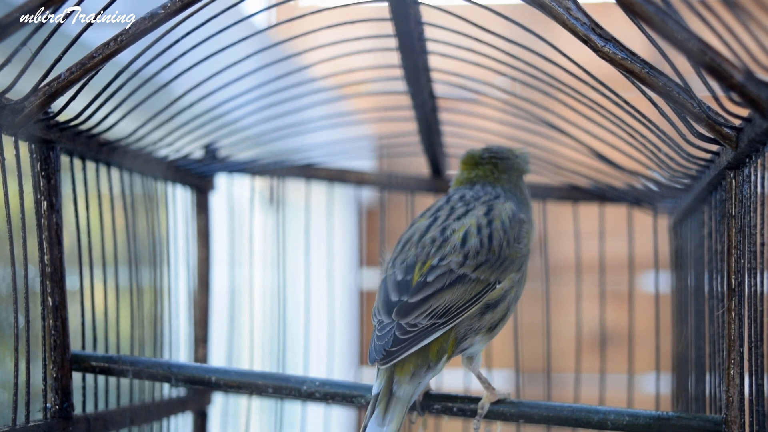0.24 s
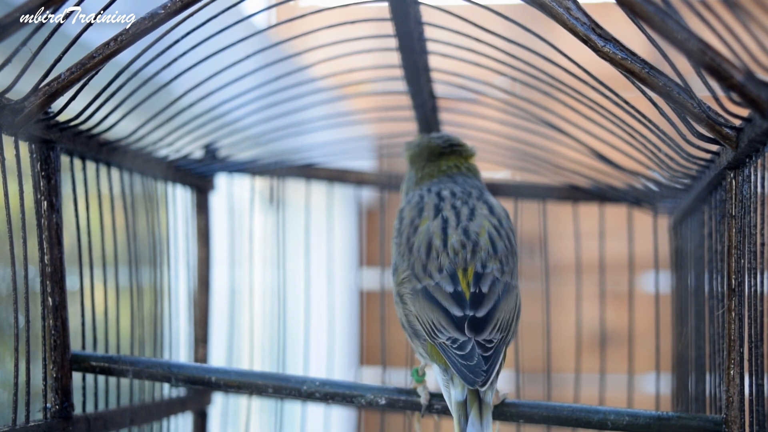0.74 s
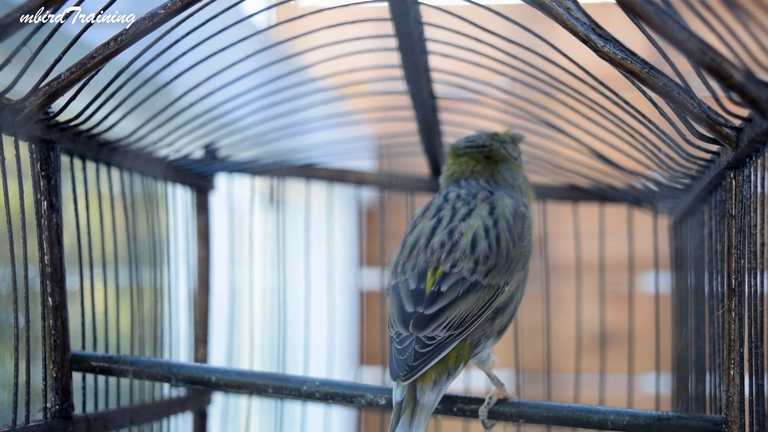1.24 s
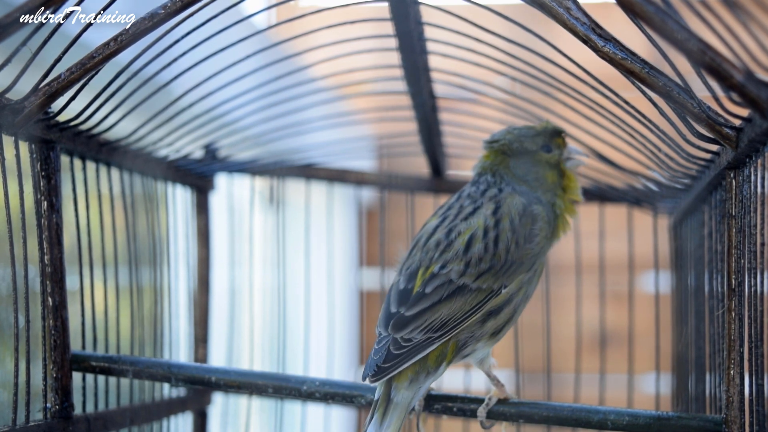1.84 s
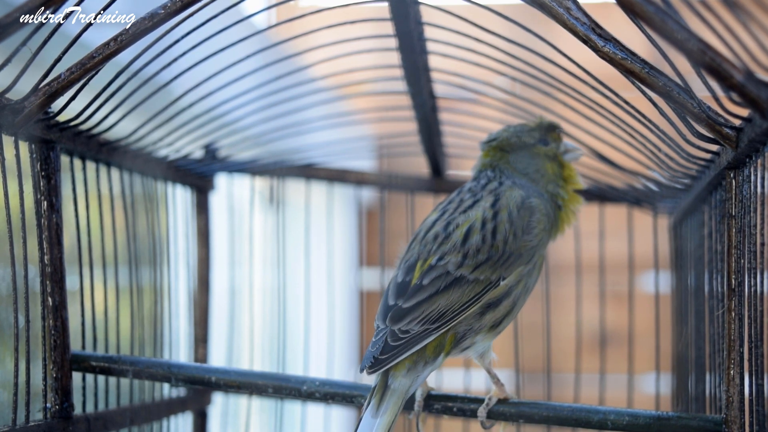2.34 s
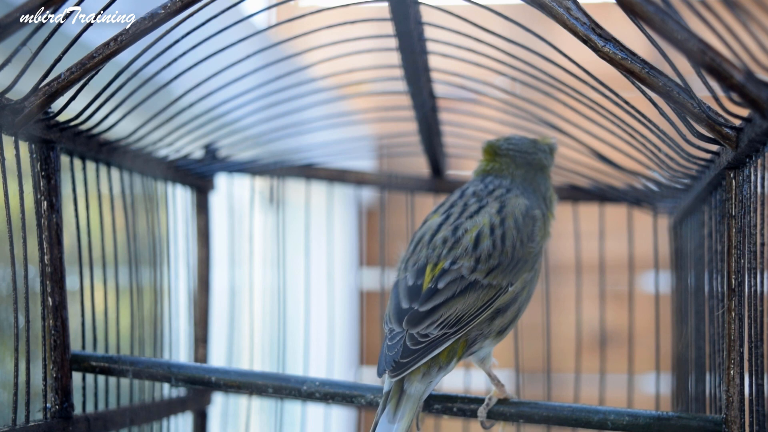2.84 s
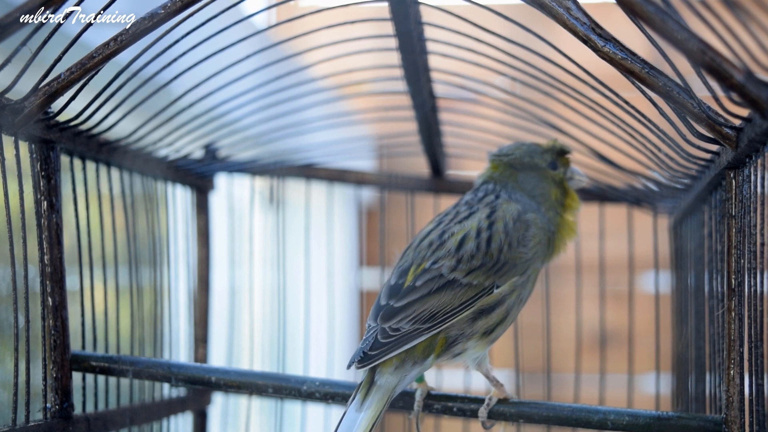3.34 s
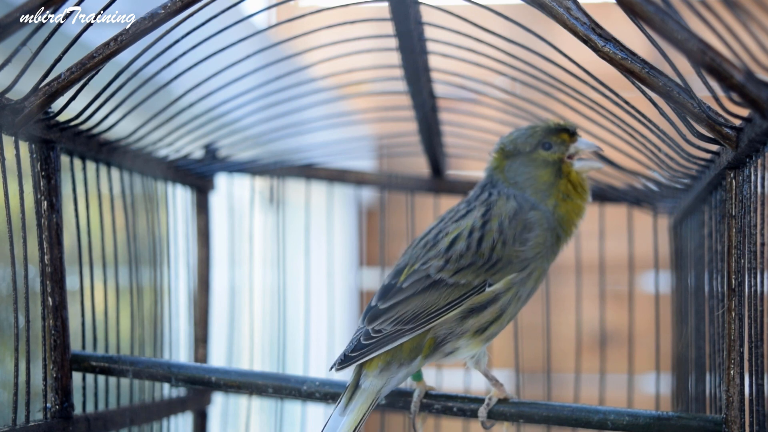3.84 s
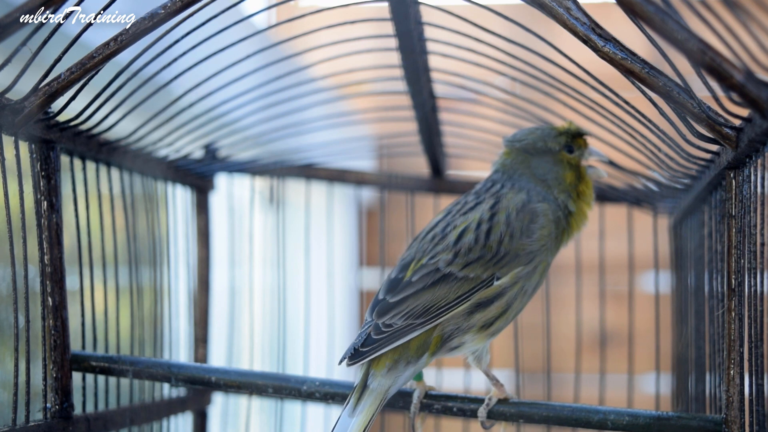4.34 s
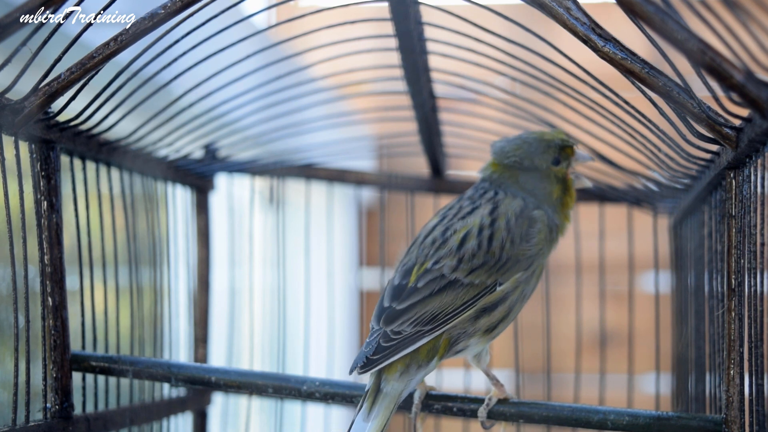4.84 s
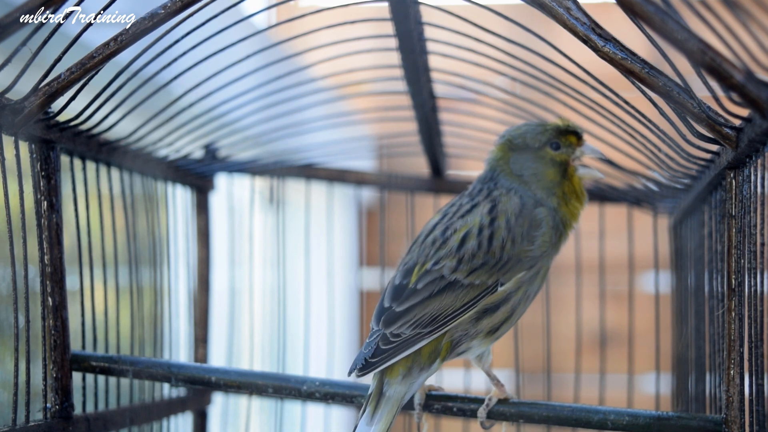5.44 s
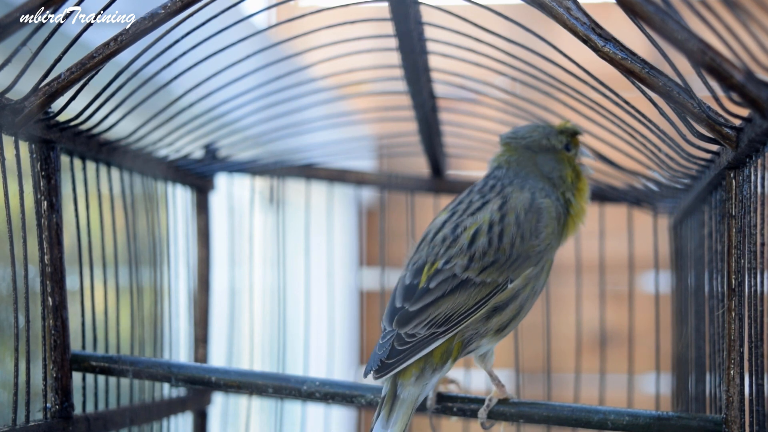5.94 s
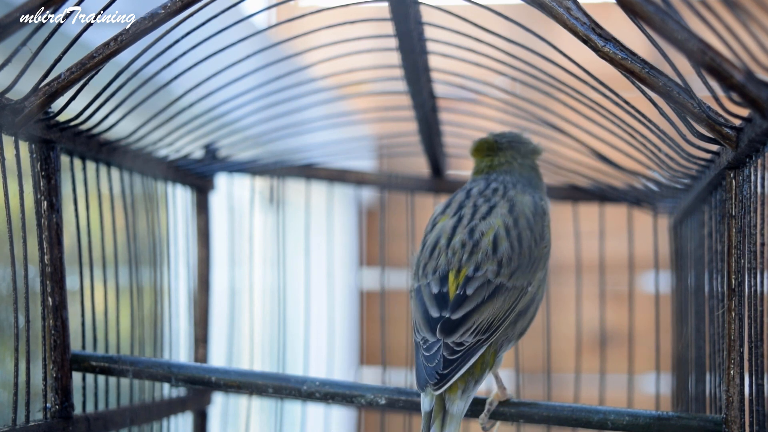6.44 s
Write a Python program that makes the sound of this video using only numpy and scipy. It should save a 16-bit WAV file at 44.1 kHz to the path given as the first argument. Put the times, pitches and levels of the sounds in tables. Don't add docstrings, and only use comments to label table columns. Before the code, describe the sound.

Bright, loud canary song, close and slightly flattened at the peaks by a limiter. It changes phrase about every second: ticking arches, steep downward chirps, a fast string of upward chirps, a low rattling roll, paired chip-and-sweep notes, then sliding whistles to the end. The small room adds a brief splashy tail; soft street noise, a far dove and distant bird calls lie beneath.

```python
import sys
import numpy as np
from scipy import signal
from scipy.fft import rfft, irfft, next_fast_len
from scipy.io import wavfile
from scipy.ndimage import uniform_filter1d

SR = 44100
rng = np.random.default_rng(int(sys.argv[2]) if len(sys.argv) > 2 else 0)


def file_out(sig):
    cols = np.atleast_2d(sig).T
    lim = np.clip(cols, -1, 1)
    pcm = np.round(lim * 32767).astype(np.int16)
    wavfile.write(sys.argv[1], SR, pcm)


def attenuation_scalar(level_db):
    decades = np.asarray(level_db, float) / 20
    return 10 ** decades


N = 295029


def along(points, hz):
    f, v = np.transpose(points)
    return np.interp(np.log(hz + 1), np.log(f + 1), v)


def shiver(count, size):
    noise = rng.standard_normal(count + 2 * size)
    return signal.fftconvolve(noise, np.hanning(2 * size), "valid")[:count] / np.sqrt(3 * size / 4)


def add_note(track, start, shape, overtones, level_db=0, pitch=1, unsteady=0.0031, flutter_db=2.5,
             fade_s=0.00096, wander=0, notch_hz=3500, notch_db=0, shimmer_db=5):
    # frequency in Hz, level in dB.
    beak_colour = [(2000, 60), (5000, -2), (6800, -9.5), (8000, -6.5), (9300, -8.5), (10700, -9.5),
                   (11800, -4.5), (13000, -9), (16000, -15.5)]
    s, hz, db = np.transpose(shape)
    t = np.arange(s[0], s[-1], 1 / SR)
    count = len(t)
    smooth = min(max(count // 16, 1), 220)
    glide = uniform_filter1d(np.interp(t, s, hz), smooth, mode="nearest")
    waver = unsteady * shiver(count, size=64) + wander * shiver(count, size=500)
    f = pitch * glide * (1 + waver)
    phase = 2 * np.pi * (np.cumsum(f) / SR + rng.random())

    tone = np.sin(phase) * attenuation_scalar(-notch_db * np.exp(-((f - notch_hz) / 240) ** 2))
    for multiple, overtone_db in overtones:
        colour_db = overtone_db + along(beak_colour, multiple * f) + shimmer_db * shiver(count, size=200)
        tone = tone + attenuation_scalar(colour_db) * np.sin(multiple * phase) * (multiple * f < SR / 2)

    to_edge_s = np.minimum(t - s[0], s[-1] - t)
    fade = np.sin(np.pi / 2 * np.clip(to_edge_s / fade_s, 0, 1)) ** 2
    loudness = attenuation_scalar(level_db + np.interp(t, s, db) + flutter_db * shiver(count, size=130))
    i = max(round((start + s[0]) * SR), 0)
    track[i:i + count] += tone * fade * loudness


def phrase(track, shape, times, overtones, spread=0.0054, **voice):
    for s, db in times:
        add_note(track, s, shape, overtones, db, 1 + spread * rng.standard_normal(), **voice)


def breath(track, events, length_s, level_db):
    gate = np.zeros(N + SR)
    puff = np.hanning(round(length_s * SR) + 2)
    for s, db, *_ in events:
        gate[round((s - length_s / 2) * SR):][:len(puff)] += attenuation_scalar(db + level_db) * puff
    steep = signal.butter(6, 5800, "high", fs=SR, output="sos")
    track += signal.sosfilt(steep, gate * rng.standard_normal(N + SR))


def hum(song):
    # frequency in Hz, level in dB per Hz.
    hum_colour = [(15, -44), (25, -13), (165, -6.5), (316, -9.5), (449, -11.5), (605, -13), (674, -9.5),
                  (1880, -15), (3060, -25), (3500, -14), (6510, -26.5), (14600, -36), (15900, -53)]
    # time in seconds, share of the squeeze.
    effort = [(0, 1.46), (.25, 0.46), (.32, 0.7786), (.95, 0.39), (1.02, 0.92), (1.7, 0.88), (2.45, 0.55),
              (2.7, 0.22), (3.55, 0.57), (4.3, 1.04), (6.69, 1.11)]
    open_db, knee_db, recover_db_per_s = -45.5, -27.5, 30.5
    squeeze = 0.74
    m = next_fast_len(N)
    colour = attenuation_scalar(along(hum_colour, np.fft.rfftfreq(m, 1 / SR)))
    noise = irfft(rfft(rng.standard_normal(m)) * colour, m)[:N]

    t = np.arange(N) / SR
    loud_db = 10 * np.log10(np.abs(uniform_filter1d(song ** 2, size=441)) + 1e-12)
    need_db = squeeze * np.interp(t, *np.transpose(effort)) * (loud_db - knee_db)
    need_db = np.maximum(need_db + recover_db_per_s * t, 9.5)
    duck_db = np.maximum.accumulate(need_db) - recover_db_per_s * t
    return noise / noise.std() * attenuation_scalar(open_db - np.clip(duck_db, 0, None))


def faint_tones():
    # time in seconds, pitch in Hz, level in dB.
    faint_calls = [
        [(0, 4780, -30.5), (.03, 4730, -29), (.05, 4738, -46), (.08, 4770, -46)],
        [(1.74, 745.1, -45), (1.77, 768, -47), (1.84, 743, -42), (1.9, 740, -54), (2.0, 710, -50),
         (2.1, 747, -57)],
        [(4.63, 2640, -77), (4.68, 2580, -60), (4.8, 2698, -63), (4.95, 2710, -76), (5.05, 2780, -67),
         (5.12, 2800, -64), (5.25, 2820, -88), (5.5, 2790, -66.5), (5.64, 2780, -66)],
        [(5.62, 2140, -65), (5.645, 2020, -49)],
    ]
    calls = np.zeros(N + SR)
    for call, blur in zip(faint_calls, [0.006, 0.0375, 0.032, 0.02]):
        add_note(calls, 0, call, [], unsteady=blur)
    return calls[:N]


def glide_whistles(track, shape, rows, foot_hz, bright_db):
    # multiple of the pitch, level in dB.
    overtones = [(2, -23.5), (3, -26.5), (4, -27)]
    # time in seconds, level in dB.
    push = [(.08, 0.5), (.13, 1), (.18, -18.5), (.225, 6), (.26, -19), (4.4, -0.5), (4.5, -7), (4.58, 2),
            (4.69, -7.5), (4.78, 0.5), (4.9, -6.5), (5.0, 1), (5.12, -6.5), (5.21, 2), (5.34, 0.5),
            (5.41, 3), (5.45, -0.5), (5.53, 3.5), (5.56, 1.5), (5.6, 0), (5.67, 2), (5.75, 0), (5.85, -2.5),
            (5.96, 1), (6.03, -0.5), (6.12, 0.5), (6.28, -1.5), (6.39, 2), (6.45, -0.5), (6.55, -1),
            (6.69, 2)]
    stage, pitch, db = np.transpose(shape)
    for start, first_s, second_s, shelf_hz, top_hz in rows:
        s = start + np.interp(stage, range(4), [0, 0.032, first_s, first_s + second_s])
        hz = np.interp(pitch, range(3), [foot_hz, shelf_hz, top_hz])
        glide = np.transpose([s, hz, db + np.interp(s, *np.transpose(push))])
        add_note(track, 0, glide, np.add(overtones, [0, bright_db]), unsteady=0.00055,
                 flutter_db=1.52, fade_s=0.0024, wander=0.0075)


def whistles(song):
    # stage (0 start, 1 scoop done, 2 step, 3 end),
    # pitch (0 foot, 1 shelf, 2 top), level in dB.
    slide = [(0, 0.029, -18.5), (0.201, 0.25, -12.5), (0.441, 0.3356, -12.5), (0.999, 0.57, -8.5),
             (1.349, .76, -13), (1.98, 1.0, -11.5), (2.248, 1.85, -6), (2.552, 1.99, -7.5),
             (2.998, 1.92, -18)]
    climb = [(0, 0.012, -20), (.44, 0.55, -5.5), (1, .76, -9.5), (1.75, .96, -10), (1.98, 1.0, -20.5),
             (2.15, 1.38, -9), (2.6, 1.62, -2.5), (2.848, 1.8, -5), (3, 1.99, -1)]
    terrace = [(0, 0.035, -21), (0.439, 0.79, -9.5), (1.001, .87, -9), (1.5, .94, -11), (1.979, 1.0, -17),
               (2.2, 1.3, -10.5), (2.45, 1.68, -18), (2.7, 1.93, -10), (2.999, 1.99, -8)]
    # start in seconds, first and second leg in seconds, shelf in Hz, top in Hz.
    slides = [
        (0.053, 0.083, 0.14, 4499, 4522),
        (5.654, 0.098, 0.14, 4395, 5340),
        (5.946, 0.09384, 0.13, 4440, 5344),
        (6.237, 0.1, 0.13, 4527, 5410),
        (6.534, 0.13, 0.068, 4610, 5060),
    ]
    climbs = [
        (4.363, 0.076, 0.056, 5610, 6950),
        (4.542, 0.09, 0.074, 5730, 6750),
        (4.744, 0.1, 0.072, 5666, 6810),
        (4.957, 0.093, 0.077, 5360, 6846),
    ]
    terraces = [
        (5.174, 0.091, 0.079, 4780, 5960),
        (5.399, 0.081, 0.1, 4602, 5840),
    ]
    # time in seconds, pitch in Hz, level in dB.
    dip = [(-.012, 2500, -29), (-.0105, 2000, -27), (-.008, 1850, -27), (-.005, 2080, -28),
           (-.002, 2400, -27), (.002, 2750, -21)]
    dip_db = [2, 2.6, 2.9, -2.2, -1.6]
    glide_whistles(song, slide, slides, foot_hz=2660, bright_db=-5.0)
    glide_whistles(song, climb, climbs, foot_hz=2780, bright_db=-2.0)
    glide_whistles(song, terrace, terraces, foot_hz=2550, bright_db=-1.5)
    dips = [(row[0], db) for row, db in zip(slides, dip_db)]
    phrase(song, dip, dips, [(2, -22), (3, -30)], spread=0.01, unsteady=0.005, flutter_db=1.2,
           fade_s=0.001, shimmer_db=2)


def grace_notes(song):
    # start in seconds, length in seconds, start pitch in Hz, end pitch in Hz, level in dB.
    graces = [(0.284, 0.019, 2690, 2736, -32.5), (0.287, 0.0091, 1780, 1845, -30),
              (1.675, 0.011, 2300, 2962, -35), (1.682, 0.012, 3030, 3270, -18.5),
              (2.651, 0.022, 2043, 2010, -30), (2.669, 0.024, 1934, 2580, -21),
              (2.674, 0.026, 2600, 2700, -15.5), (2.694, 0.01, 2225, 1080, -25.5),
              (3.534, 0.0044, 1940, 1467, -18.5), (3.993, 0.019, 3740, 3690, -23),
              (4.358, 0.0068, 2140, 3240, -33), (4.537, 0.0064, 3650, 2500, -20),
              (4.742, 0.0029, 2080, 3614, -22.5), (5.159, 0.0052, 3030, 2390, -27),
              (5.394, 0.0085, 3940, 2630, -21)]
    grace_bright_db = [4, -10, 4, 2.5, 9, 2, 9, -2, -1.5, -3, 5, -9, 1.5, -10, -9]
    for (s, length, start_hz, end_hz, db), bright_db in zip(graces, grace_bright_db):
        shape = [(0, start_hz, db), (length, end_hz, db)]
        overtones = np.add([(2, -27.5), (3, -25.5), (4, -33.5)], [0, bright_db])
        add_note(song, s, shape, overtones, unsteady=.006, flutter_db=4.0, fade_s=0.0016)


def arches(song):
    # time from centre in seconds, pitch in Hz, level in dB.
    arch = [(-.008, 1740, -19.5), (-.005, 2336, -15), (0, 2680, -3), (.004, 2550, -4.5), (.007, 2100, -16),
            (.01, 1527, -22), (0.014, 1020, -35)]
    arch_echo = [(.007, 2736, -26.5), (0.014, 2780, -23), (0.026, 2610, -33)]
    pip = [(-.015, 2240, -18.5), (-.012, 2480, -20.5), (-.0095, 2600, -11)]
    run_up = [(-.014, 3500, -15), (-.008, 3870, -19.5), (-.004, 4500, -45)]
    tick = [(-.0008, 5350, -5), (.0006, 5133, -2.5), (.0018, 4750, 0.5), (.0034, 4250, 13.5)]
    # time in seconds, level in dB, pitch factor, level of the echo in dB.
    arch_times = [
        (0.304, -17.5, 0.91, -3.5),
        (0.366, -4.5, 1.014, 4.5),
        (.433, -5, 0.95, 7),
        (.501, -10, 0.96, 5.5),
        (0.563, -3, 1.035, -12),
        (0.627, -2.5, 0.98, -3),
        (0.693, -3.5, 1.0, -22.5),
        (0.762, -3.5, 1.02, -17.5),
        (0.83, -4, 0.99, -13),
    ]
    pip_db = [-3, -9.5, -3, 1.5, -4.5, -1.5, -5.5, -1]
    # time in seconds, level in dB, pitch factor.
    tick_times = [
        (0.328, -10, 1.045),
        (0.3959, -10, 1.07),
        (0.4603, -6.5, 1),
        (0.526, -7.5, 1.02),
        (0.592, -6.5, 0.98),
        (0.6574, -7.5, 0.98),
        (0.724, -7, 0.98),
        (0.7916, -11, 1.02),
        (0.862, -10.5, 1.003),
    ]
    for s, db, pitch, echo_db in arch_times:
        add_note(song, s, arch, [(2, -36.5), (3, -25), (5, -38)], db, pitch, unsteady=0.0059,
                 flutter_db=-1.05, fade_s=0.001067)
        add_note(song, s, arch_echo, [], echo_db, pitch, unsteady=0.017, flutter_db=2, fade_s=0.00277)
    pips = [(row[0], db) for row, db in zip(arch_times[1:], pip_db)]
    phrase(song, pip, pips, [], spread=0.02, flutter_db=1)
    run_ups = [(s, db) for s, db, _ in tick_times]
    phrase(song, run_up, run_ups, [], spread=0.068, unsteady=0.035, flutter_db=1)
    for s, db, pitch in tick_times:
        add_note(song, s, tick, [(2, -16.5), (3, -13.5)], db, pitch, fade_s=.0013, flutter_db=1.1,
                 shimmer_db=4)
    breath(song, tick_times, 0.0031, level_db=-26)
    breath(song, arch_times, 0.016, level_db=-44)


def falls(song):
    # time in seconds, pitch in Hz, level in dB.
    fall = [(-.016, 6190, -34), (-.011, 5754, -19.5), (-.006, 5280, -4), (-.001, 5175, -14),
            (.003, 4740, -1), (.0055, 4620, -14), (.009, 4050, -8.5), (.012, 3677, -17), (.0155, 3150, -38)]
    fall_top = [(0, 7150, -31), (.008, 7020, -27), (0.016, 6700, -26), (0.024, 6250, -28.5),
                (0.031, 5900, -34.5)]
    # time in seconds, level in dB.
    fall_times = [
        (1.0004, 0.36),
        (1.0884, -0.273),
        (1.1805, -0.036),
        (1.269, 0.137),
        (1.3546, -0.32),
        (1.4405, 0.45),
        (1.532, 0.335),
        (1.621, 0.3),
    ]
    lead_db = [7, -1.5, -5.5, -1.5, -5, -1.5, -4.5, 0.5]
    fall_pace = [0.91, 1, 0.95, 1.02, 1.1, 1.4, 0.93, 2.7]
    leads = [(s - 0.0425, db) for (s, _), db in zip(fall_times, lead_db)]
    phrase(song, fall_top, leads, [(2, -17)], flutter_db=3)
    for (s, db), pace in zip(fall_times, np.clip(fall_pace, .8, 1.2)):
        stretched = np.multiply(fall, [pace, 1, 1])
        add_note(song, s, stretched, [(2, -28), (3, -25)], db, flutter_db=0.3, fade_s=0.00202)
    breath(song, fall_times, 0.016, level_db=-43.5)


def rises(song):
    # time in seconds, pitch in Hz, level in dB.
    rise = [(-0.031, 1825, -26), (-0.028, 2683, -15), (-0.023, 3032, -12), (-0.015, 3692, -15),
            (-0.008, 3835, -13.5), (0, 4840, -6), (0.004, 5340, -5.5), (0.008, 5994, -15.5),
            (0.014, 6200, -20.5)]
    top_echo = [(.012, 5950, -27.5), (0.017, 5633, -14.5), (.021, 5550, -15.5)]
    # time in seconds, level in dB, cancelled pitch in Hz, echo level in dB, pitch factor.
    rise_times = [(1.71, -2, 3625, -1.5, 1.03), (1.7704, -1, 3700, 3.5, 1.007),
                  (1.8345, -1.5, 3380, 2.5, 0.98), (1.8998, -1.5, 3430, 1, 0.9824),
                  (1.961, -2, 3620, -6.5, 0.98), (2.0235, -2.5, 3311, -0.5, 0.99),
                  (2.088, -1.5, 3820, -2, 0.98), (2.152, -1.5, 4150, -5, 1.018),
                  (2.217, -2, 4040, 0.5, .99), (2.2823, -3, 3400, 1.5, 0.98), (2.3489, -3, 3590, -4, 1),
                  (2.4136, -2, 3760, -4, 0.95)]
    for s, db, cancelled_hz, top_echo_db, pitch in rise_times:
        add_note(song, s, rise, [(2, -24), (3, -26.5)], db, pitch, flutter_db=1.5, fade_s=0.0017,
                 notch_hz=cancelled_hz, notch_db=11)
        add_note(song, s, top_echo, [(3.9, -15.5)], top_echo_db, pitch, unsteady=.012, flutter_db=1.5, fade_s=0.0021)
    breath(song, rise_times, 0.016, level_db=-44)


def roll(song):
    # time in seconds, pitch in Hz, level in dB.
    knock = [(-.0008, 3090, 1.5), (.0003, 2560, 3.5), (.0011, 2304, 1), (.002, 2150, -1),
             (.0032, 1940, -16)]
    under = [(.006, 2225, -30), (0.01, 2157, -25), (0.019, 2250, -30)]
    # share of the gap, pitch in Hz, level in dB.
    stroke = [(.3, 2697, -34.5), (.45, 2893, -27.5), (.62, 3030, -19.5), (.8, 3250, -24.5),
              (.93, 3400, -36)]
    # time in seconds, level in dB, pitch in Hz.
    knock_times = [(2.7515, -12.5, 2010), (2.7867, -12, 2360), (2.8183, -10.5, 2150), (2.8535, -10, 2330),
                   (2.888, -10.5, 2460), (2.9213, -11, 2160), (2.9546, -7.5, 2560), (2.9903, -8, 2300),
                   (3.0238, -8, 2415), (3.0607, -8.5, 2476), (3.095, -8, 2430), (3.1282, -8, 2780),
                   (3.1633, -11.5, 2250), (3.1982, -10, 2405), (3.2345, -9, 2530), (3.27, -10, 2630),
                   (3.305, -8.5, 2820), (3.341, -9, 2380), (3.3772, -8, 2730), (3.4167, -7.5, 2690),
                   (3.4513, -8.5, 2460), (3.4882, -8, 2850), (3.53, -11, 2790)]
    usual_hz, own_share = 2315, 0.61
    roll_start = knock_times[0][0]
    for s, db, own_hz in knock_times:
        hz = usual_hz + own_share * (own_hz - usual_hz)
        octave_db = -31 + 14 * (s - roll_start)
        add_note(song, s + .0008, knock, [(2, octave_db), (3, -24.5), (4, -47.0)], db, hz / 2300,
                 unsteady=0.0042, shimmer_db=5.5, flutter_db=0.45)
    breath(song, np.add(knock_times, [.002, 0, 0]), 0.0031, level_db=-27)
    for (s, *_), (next_s, *_) in zip(knock_times, knock_times[1:]):
        stretched = np.multiply(stroke, [next_s - s, 1, 1])
        phrase(song, stretched, [(s, 0)], [(2, -21), (3, -22.5), (4, -43)], spread=0.012,
               unsteady=0.004, flutter_db=4, fade_s=0.00099)
        phrase(song, under, [(s, 0)], [], spread=0.033, unsteady=0.019, flutter_db=0.5, fade_s=0.0017)


def tour(song):
    # time in seconds, pitch in Hz, level in dB.
    chip = [(-.001, 4640, -0.5), (.0006, 4570, -2.5), (.0018, 5130, 2.5), (.003, 5380, -16),
            (.007, 5450, -13), (0.015, 5450, -26)]
    short_sweep = [(-0.012, 2550, -16.5), (-0.008, 3224, -10.5), (-0.003, 4340, -9), (0.002, 5180, -12),
                   (0.007, 5400, -17.5), (0.014, 5520, -26.5)]
    long_sweep = [(-0.013, 2210, -19.5), (-0.008, 3374, -7.5), (-0.003, 4230, -9), (0.002, 5050, -7),
                  (0.008, 5250, -10.5), (0.018, 5520, -14), (0.027, 5490, -16)]
    cluck = [(.0395, 1750, -23), (.042, 2100, -17), (.045, 2350, -24)]
    gulp = [(.049, 2240, -41), (0.052, 1915, -39), (.056, 1450, -33), (.061, 1070, -22.5)]
    gulp_top = [(0.053, 3540, -29), (0.057, 2870, -19), (.059, 2400, -43)]
    # time in seconds, level in dB, pitch in Hz.
    chip_times = [
        (3.595, -6.5, 5500),
        (3.6928, -7.5, 4960),
        (3.783, -6, 5620),
        (3.8813, -6, 4680),
        (3.971, -5, 5480),
        (4.07, -7.5, 5252),
        (4.16, -4, 5630),
        (4.2577, -7, 4970),
    ]
    # time in seconds, level in dB, cancelled pitch in Hz, notch depth in dB;
    # short sweeps add the cluck level in dB.
    short_times = [
        (3.6207, 3, 4678, 5, 3),
        (3.8101, 1.9, 4670, 2, 0),
        (3.995, 2, 4420, 30, 0),
        (4.1855, 1.9, 4170, 12, 2),
    ]
    long_times = [
        (3.725, 0.84, 5300, 2.78),
        (3.9117, 0.23, 3850, 7.31),
        (4.099, -0.27, 3200, 6.8),
        (4.2888, -0.069, 3830, 17),
    ]
    for s, db, hz in chip_times:
        add_note(song, s, chip, [(2.2, -18)], db, hz / 5000, flutter_db=0.2, shimmer_db=3.5)
    breath(song, chip_times, 0.0031, level_db=-26)
    short_part = short_sweep, short_times, [(2, -26.5), (3, -34)]
    long_part = long_sweep, long_times, [(2, -24), (3, -33.5)]
    for shape, rows, overtones in (short_part, long_part):
        for s, db, cancelled_hz, depth_db, *_ in rows:
            add_note(song, s, shape, overtones, db, flutter_db=1.0, fade_s=0.0017,
                     notch_hz=cancelled_hz, notch_db=depth_db)
    breath(song, short_times + long_times, 0.016, level_db=-40)
    clucks = [(row[0], row[-1]) for row in short_times]
    phrase(song, cluck, clucks, [(4, -26)], spread=.03, flutter_db=1, fade_s=.0015)
    phrase(song, gulp, clucks, [(2, -40)], spread=.03, unsteady=.03, flutter_db=1.5, fade_s=.002)
    phrase(song, gulp_top, clucks, [], spread=.04, unsteady=.03, flutter_db=2, fade_s=.002)


def canary():
    song = np.zeros(N + SR)
    for sing in (whistles, grace_notes, arches, falls, rises, roll, tour):
        sing(song)
    return song[:N]


def room_reply(smear_s=0.0093):
    # frequency in Hz, level in dB.
    tail_colour = [(1500, -3.5), (2100, -1), (2700, -0.5), (6000, -2), (9000, -2.5), (14000, -3.5)]
    # frequency in Hz, time to fall 60 dB in seconds.
    decay = [(500, 0.18), (1900, 0.21), (2800, 0.2), (4200, 0.21), (5600, 0.22), (7000, 0.21),
             (10000, 0.26)]
    # delay in seconds, level in dB.
    walls = [(.004, -11.5), (.007, -10), (0.0102, -13), (0.016, -15.5), (0.023, -24.5), (.027, -29.5)]
    # frequency in Hz, level in dB.
    wall_colour = [(1200, -10.5), (1900, 4), (2500, -1.5), (3500, -0.5), (4500, -5), (5700, -9.5),
                   (7500, 3), (12000, 3)]
    hz, t, z = signal.stft(rng.standard_normal(SR // 2), SR, nperseg=256)
    fading_db = along(tail_colour, hz)[:, None] - 60 * t / along(decay, hz)[:, None]
    tail = signal.istft(z * attenuation_scalar(fading_db), SR, nperseg=256)[1]
    tail *= np.clip(np.arange(len(tail)) / SR / .008, 0, 1) ** 2
    reply = attenuation_scalar(-10.5) * tail / np.linalg.norm(tail)

    after = np.arange(600) / SR
    near = np.zeros(4096)
    for s, db in walls:
        smear = rng.standard_normal(len(after)) * attenuation_scalar(-60 * after / smear_s)
        near[round(s * SR):][:len(after)] += attenuation_scalar(db) * smear / np.linalg.norm(smear)
    colour = attenuation_scalar(along(wall_colour, np.fft.rfftfreq(len(near), 1 / SR)))
    reply[:len(near)] += irfft(rfft(near) * colour)
    return reply


def room(x, size=8192):
    out = np.pad(x, (size, SR + size))
    direct = out.copy()
    window = np.sin(np.pi * np.arange(size) / size)
    for i in range(0, N + size, size // 2):
        wet = signal.fftconvolve(direct[i:i + size] * window, room_reply())
        out[i:i + len(wet)] += wet
    return out[size:size + N]


def scene():
    song = room(attenuation_scalar(-2.0) * canary() + faint_tones())
    return (song + hum(song))[None]


def low_pass(x):
    return signal.sosfilt(signal.butter(12, 16010, fs=SR, output="sos"), x)


def record(dry):
    top = 0.45
    envelope = np.abs(signal.hilbert(dry, next_fast_len(N)))[:, :N]
    envelope = uniform_filter1d(uniform_filter1d(envelope, size=22), size=22)
    held = dry * (1 + (envelope / top) ** 8) ** (-1 / 8)
    bend = attenuation_scalar(-32.5) * held ** 2 / top + attenuation_scalar(-18) * held ** 3 / top ** 2
    bend = signal.sosfiltfilt(signal.butter(8, 6920, "high", fs=SR, output="sos"), bend)
    band = signal.sosfiltfilt(signal.butter(16, 15900, fs=SR, output="sos"), held + bend)
    return low_pass(band)


dry = scene()
out = record(dry)
file_out(out)
```